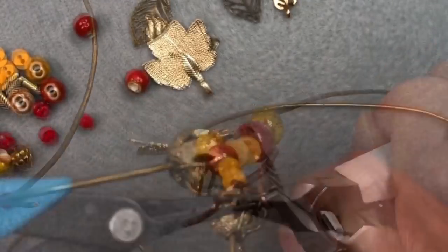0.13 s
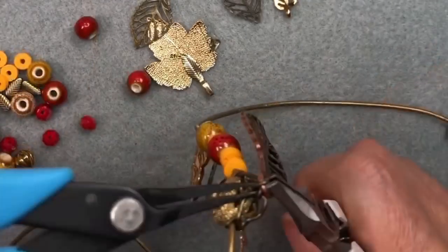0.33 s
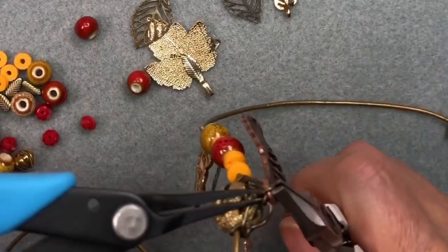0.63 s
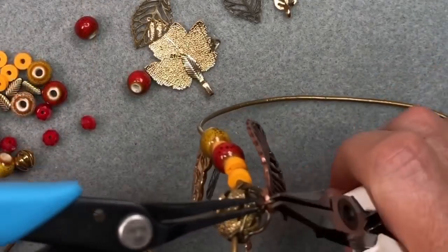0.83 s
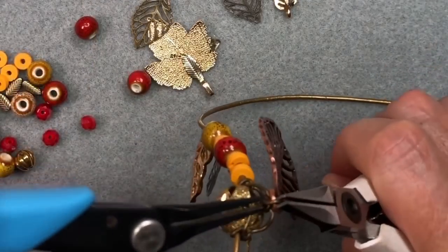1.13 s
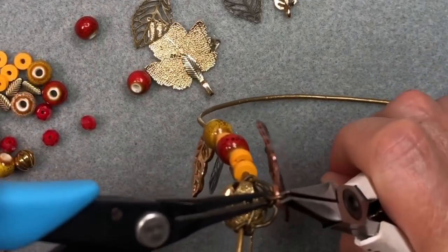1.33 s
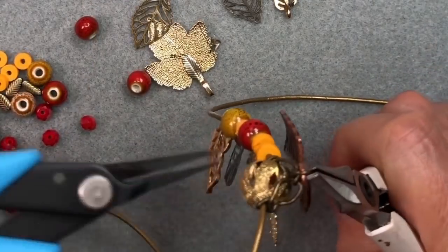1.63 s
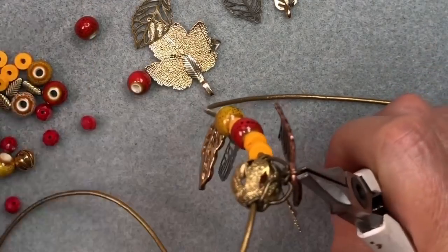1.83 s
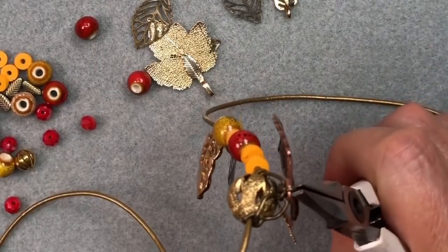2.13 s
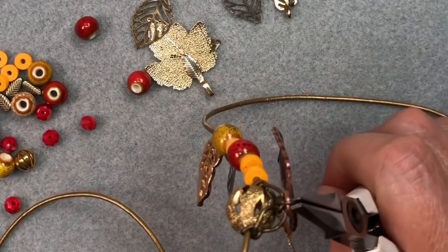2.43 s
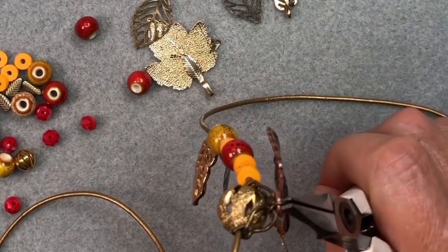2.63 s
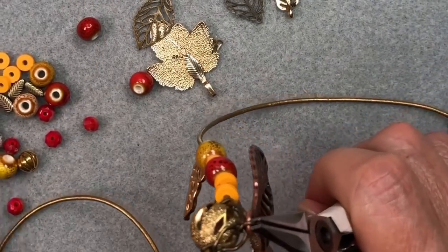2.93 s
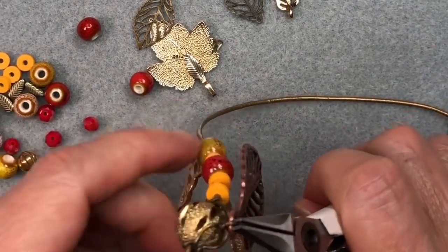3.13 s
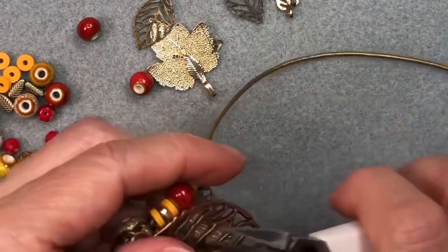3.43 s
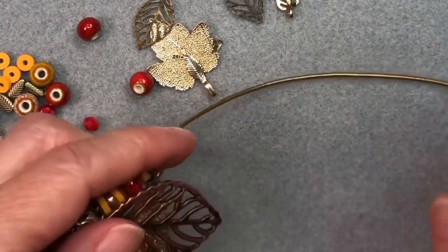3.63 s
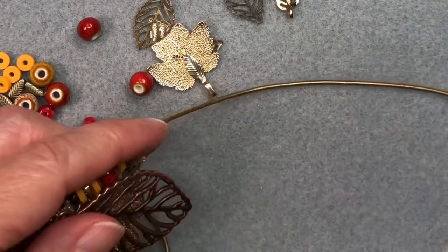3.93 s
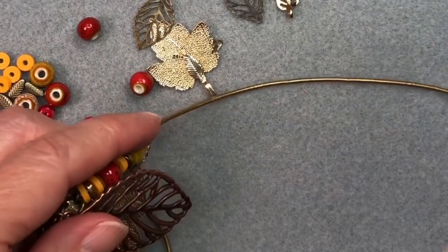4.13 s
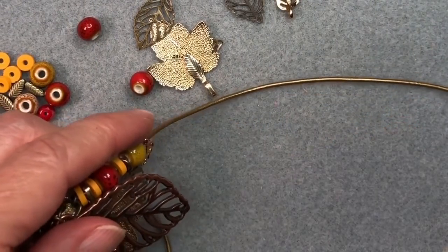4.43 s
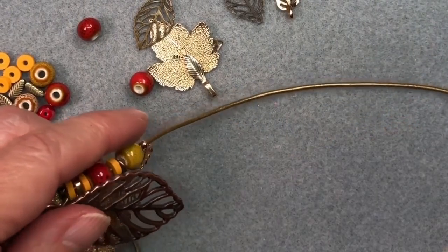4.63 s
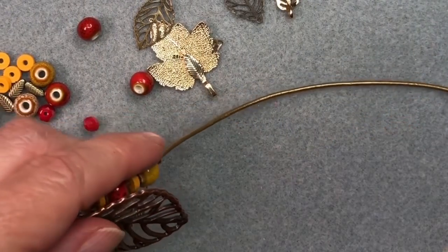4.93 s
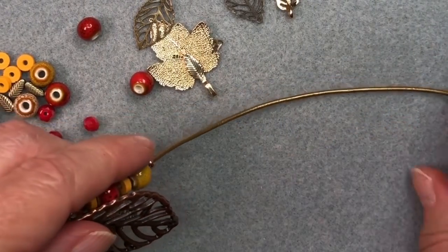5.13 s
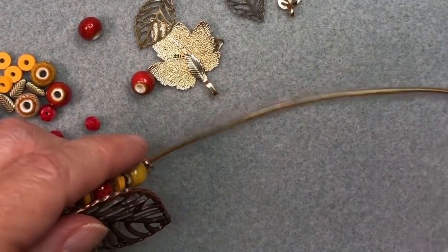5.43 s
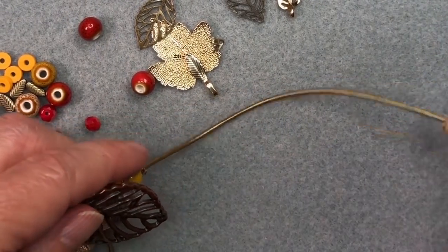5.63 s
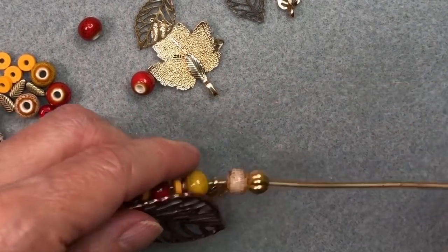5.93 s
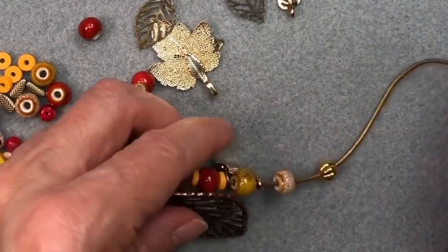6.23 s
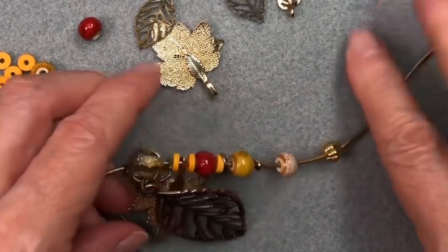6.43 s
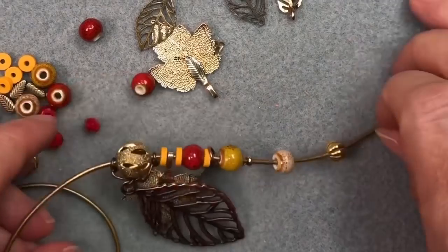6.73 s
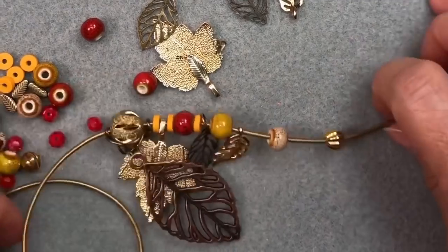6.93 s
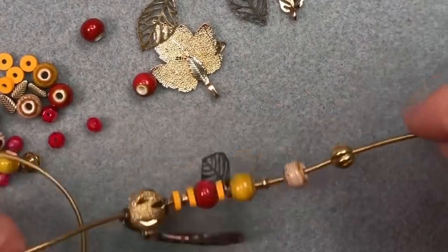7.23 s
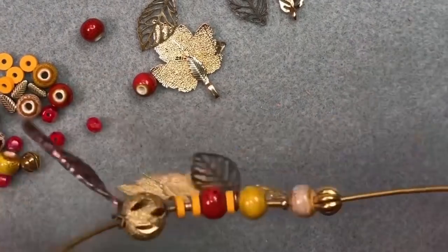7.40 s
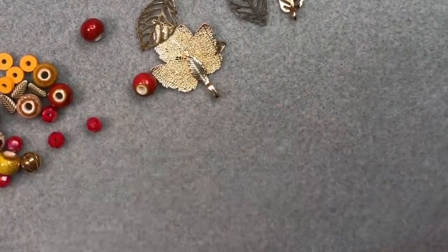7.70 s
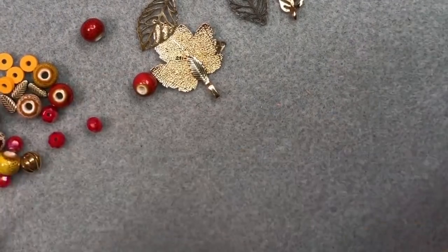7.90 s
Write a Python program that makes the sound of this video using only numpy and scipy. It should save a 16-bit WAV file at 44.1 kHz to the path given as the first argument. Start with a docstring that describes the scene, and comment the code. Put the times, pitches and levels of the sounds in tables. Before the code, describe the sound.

Fingers brush faintly over a felt mat in a quiet room, heard close up. Small pliers tick at about 1.5 seconds and clack at 2.4, with dull table thumps near 1.9 and 2.8. Around 3 seconds their hinge gives a very faint, thin squeak and tiny charms tinkle. At 4.3 a tool scrapes briefly on the board under the felt, landing with a sharp knock at 4.5. A wooden joint creaks faintly, rising, from about 4.9 to 5.7, with a bead knock and a metal clink at 5.3. Beads knock again at 6. The loudest moment comes at 6.4, when a large metal leaf clinks brightly twice while beads clatter on the board. Lighter taps and a clink follow just after 7. From 7.4 small charms tinkle delicately to the end, with another firm knock of beads at 7.8.

```python
"""Fingers brush a felt mat in a quiet room, and a tool lands with a soft thump: beadwork, heard up close.
Pliers and beads tick and clack, a hinge squeaks and small charms tinkle. Later a tool scrapes the board
under the felt, a wooden joint creaks, beads knock on the board and a large metal leaf clinks.
Things that ring are sums of fading tones; ticks, thuds and rubbing are shaped noise. The creak is a
quick run of tiny slips, each one knocking the wood."""
import sys
import numpy as np
from scipy import signal
from scipy.fft import rfft, irfft, next_fast_len
from scipy.io import wavfile
from scipy.ndimage import uniform_filter1d

SR = 44100
rng = np.random.default_rng(int(sys.argv[2]) if len(sys.argv) > 2 else 0)


def to_wav(sig):
    """Store sig (one row per channel, or 1-D mono) as 16-bit WAV at the path in sys.argv[1].

    Samples outside -1..1 are clipped; the rate is SR.
    """
    pcm = np.clip(np.atleast_2d(sig), -1, 1) * 32767
    pcm = np.round(pcm).astype(np.int16)
    wavfile.write(sys.argv[1], SR, pcm.T)  # frames by channels


N = 355622

# A fade_s is the time to fade by 60 dB. A blow's ring_factor multiplies it: smaller is more muffled.
# finger strokes over the felt: start_s, length_s, level_db
STROKES = [(-.02, 0.13, -65.5), (.08, 0.16, -67.5), (1.35, 0.12, -71), (2.222, 0.27, -61.5),
           (2.48, 0.26, -63.5), (2.666, 0.2, -59.5), (3.054, 0.29, -58), (3.376, 0.6, -64.5),
           (4.17, 0.4, -60), (5.018, 0.16, -59.5), (5.113, 0.14, -62), (5.3, 0.82, -62.5),
           (5.86, 0.17, -65), (5.98, 0.33, -70), (6.656, 0.22, -59), (6.698, 0.39, -59),
           (6.92, 0.26, -59.5), (7.351, 0.45, -75), (7.787, 0.35, -64)]
# tone colour of each steady or rubbing noise: pitch_hz, level_db
BRUSH_COLOUR = [(1500, -30), (3000, -14), (5000, -6), (8000, 0), (10500, -4), (13000, -12), (16000, -27)]
AIR_COLOUR = [(4.7, -38.5), (8.0, 10), (30, -10), (104, -25.5), (179, -32), (238, -22), (287, -33),
              (420, -32.5), (844, -40), (1090, -38.5), (1320, -40.5), (8810, -51.5), (15600, -51)]
MURMUR_COLOUR = [(60, -22.5), (120, 4.5), (240, -5), (400, -1), (700, -12.5), (1500, -16.5), (4000, -47.5)]
RUMBLE_COLOUR = [(20, -2.5), (60, 2.5), (110, -6.5), (200, -29.5), (500, -72.5)]
SCRAPE_COLOUR = [(88, -21), (150, 0), (346, -3.5), (800, -8), (1700, -5.5), (3500, -13.5), (8710, -19),
                 (14000, -32)]
# rise and fall of the room's low murmur: time_s, level_db
MURMUR_LEVELS = [(0.0, -77), (3.16, -62), (3.86, -75.5), (5.32, -56.5), (5.75, -74.5), (6.44, -58.5),
                 (8.06, -71)]
# dull tool thuds, two high ticks, a bright room tail: start_s, level_db, pitch_hz, fade_s, width_octaves
THUDS_AND_TREBLE = [(.073, -55.5, 450, 0.12, 0.43), (.0995, -50.5, 486, 0.18, 0.94),
                    (1.4945, -30.5, 8500, 0.033, 0.24), (1.494, -42, 2450, 0.087, 1.3),
                    (1.921, -52, 770, 0.15, 0.45), (1.9395, -33, 540, 0.072, 0.72),
                    (2.397, -40, 445, 0.2, 0.65), (2.421, -44.5, 1300, 0.072, 1.2),
                    (2.551, -55.5, 1150, .19, 0.98), (2.59, -48, 825, 0.038, 0.92),
                    (2.776, -23.5, 420, 0.087, 0.88), (2.778, -30, 2780, 0.076, 1.02),
                    (2.7835, -29.5, 5830, 0.022, 0.21), (4.505, -20.5, 850, 0.042, 1.2),
                    (4.508, -32.5, 370, 0.23, 0.44), (4.508, -35.5, 6450, 0.33, 0.34),
                    (4.537, -30, 390, 0.027, 1.7), (5.33, -39.5, 855, 0.18, 1.16),
                    (6.47, -25.5, 1920, 0.047, 0.91), (6.762, -50.5, 640, 0.2, 1.04)]
# pliers, beads and chain touching: start_s, level_db, pitch_hz
TICKS = [(0.0996, -49.5, 5650), (0.1674, -49.5, 3600), (1.2356, -55, 3280), (1.258, -58, 8100),
         (1.332, -61, 8600), (1.479, -49, 7500), (1.4943, -36, 8100), (1.514, -62, 7540),
         (1.662, -60, 6500), (1.7953, -52.5, 10100), (1.938, -44.5, 3230), (2.3942, -27.5, 11200),
         (2.41, -40, 11000), (2.4195, -35, 11000), (2.5576, -49.5, 6130), (2.5908, -46, 5900),
         (3.043, -50, 9600), (3.1128, -30.5, 9200), (3.237, -31.5, 11700), (3.3583, -56, 6480),
         (3.3812, -50, 8440), (4.2612, -50, 6050), (4.282, -45, 9640), (4.3982, -47, 4170),
         (4.5045, -15, 5630), (5.008, -54, 3230), (5.3557, -27, 6850), (5.5263, -42.5, 10000),
         (5.55, -48, 9500), (5.687, -41.5, 5600), (5.7259, -48, 7900), (5.8659, -31.5, 8600),
         (5.935, -56, 9000), (5.9534, -41, 11800), (6.022, -32, 4500), (6.3747, -5.5, 7000),
         (6.4203, -14, 6650), (7.056, -42, 9210), (7.068, -53, 9000), (7.1176, -27.5, 5430),
         (7.2165, -47, 7500), (7.2419, -32.5, 10900), (7.298, -47, 9200), (7.453, -48.5, 9990),
         (7.608, -51.5, 9000), (7.732, -60, 6380), (7.812, -42, 6000), (7.8196, -32, 3540),
         (7.9354, -38, 8360), (7.946, -48, 7600)]
# treble lost beside the microphone: pitch_hz, level_db
TREBLE_LOSS = [(9000, -5), (12000, -5), (16000, -27)]
# blows that set each thing ringing: start_s, level_db, pitch_hz, ring_factor
LEG_SWAYS = [(.085, -46.5, 60, 0.25), (1.933, -26.5, 36.4, 0.72), (2.57, -39.5, 32, 0.74),
             (2.69, -41, 70.5, 1), (2.776, -26, 70, 0.7), (4.3, -37, 37, 0.18), (4.505, -31.5, 37.2, 0.49),
             (6.023, -39, 50.3, 0.17), (6.376, -38.5, 31.8, 1), (6.76, -35, 30.6, 0.28)]
TABLE_THUMPS = [(.09, -44.5, 177, 0.53), (1.933, -26, 202, 0.72), (1.955, -25.5, 165, 0.84),
                (2.392, -31, 197, 0.96), (2.773, -17.5, 181.4, 0.44), (4.316, -71, 266, 0.67),
                (4.505, -34, 132, 0.65), (4.537, -35.5, 129, 1), (6.024, -29, 247, 0.92),
                (6.375, -35.5, 201, 1), (7.813, -37.5, 236, 1)]
PLIER_CLACKS = [(1.4965, -31, 9000, 0.24), (2.3943, -19, 4160, 0.68), (2.41, -25.5, 3000, 0.53),
                (2.42, -34, 2500, 0.4), (2.785, -31, 2900, 1.3)]
CHARM_TINKLES = [(3.103, -38, 7540, 0.1), (3.146, -37, 9100, 0.12), (3.166, -41, 9800, 0.14),
                 (3.197, -41, 8900, 0.13), (3.225, -38, 10700, 0.094), (3.252, -34, 8800, 0.16),
                 (3.281, -40, 9900, .11), (7.375, -55, 8600, .5), (7.389, -49, 9400, .25),
                 (7.393, -58, 12600, .4), (7.454, -37.5, 10500, 0.32), (7.462, -53, 6000, .3),
                 (7.52, -57, 10200, .2), (7.613, -50.5, 8600, 0.56), (7.617, -53, 13040, 0.48),
                 (7.65, -64, 7150, 0.55), (7.707, -59, 7400, .6), (7.71, -62, 12500, .3),
                 (7.74, -52, 8900, 0.28), (7.771, -56, 9040, 0.34), (7.821, -41, 7500, 0.62),
                 (7.826, -44, 11200, 0.74), (7.849, -41, 12700, 0.35), (7.967, -42.5, 10360, 0.4),
                 (8.01, -47, 11300, 0.27)]
BOARD_KNOCKS = [(5.327, -29, 975, 1), (5.3555, -18, 1320, 0.26), (6.0235, -10.5, 1035, 0.42),
                (6.315, -34, 836, 0.8), (6.3735, -7.5, 1310, 0.39), (6.394, -13.5, 835, 0.3),
                (6.4205, -11.5, 1260, 0.37), (6.445, -20, 1103, 0.57), (7.011, -34.5, 1390, 0.39),
                (7.047, -25, 1300, 0.24), (7.1185, -26.5, 1630, 0.33), (7.156, -36, 1620, 0.31),
                (7.226, -43, 1180, 0.5), (7.246, -33.5, 980, 0.21), (7.265, -41.5, 895, .47),
                (7.812, -13, 1070, 0.24), (7.8205, -9.5, 1550, 0.22)]
LEAF_CLINKS = [(5.3275, -34, 6840, 0.75), (5.356, -21.5, 7160, 0.33), (6.3765, -2.5, 7900, 0.41),
               (6.421, -3, 8030, 0.31), (7.118, -24, 6100, 0.38), (7.156, -48, 8000, 0.26)]
# the tones each thing rings with: pitch_hz, level_db, fade_s
LEG_TONES = [(32, 0, .3), (68.2, 0, 2.3)]
TABLE_TONES = [(138, 0, .4), (157, 0, .55), (200, 0, .3), (262, -4, .15), (335, -6, .12)]
PLIER_TONES = [(1430, 13, 0.015), (2870, -14, 0.06), (3580, -5, 0.02), (6100, -9, .03), (6860, -8, 0.05),
               (7700, -5, .025), (8760, -4, 0.09), (10450, -8, .035), (11300, -3, 0.045),
               (12700, -8, 0.035)]
CHARM_TONES = [(5300, -4, .1), (6100, -2, .1), (7150, -3, .18), (7450, -2, .12), (8300, -9, .06),
               (9020, 0, .12), (10000, 0, .12), (10900, -9, .05), (11600, -3, .11), (12550, -2, .12),
               (13100, -3, .1), (14100, -2, .1), (14800, -5, .08)]
BOARD_TONES = [(362.5, 7, 0.38), (522, -8, 0.11), (764.6, 0.5, 0.072), (823, -5, 0.12), (1070, -1.5, 0.021),
               (1151, 2.5, 0.069), (1300, -1.5, 0.049), (1496, -3.5, 0.057), (1863, 2.5, 0.059),
               (2050, -10.5, 0.24), (2192, -4.5, 0.092), (3270, -0.5, 0.075)]
# the metal leaf's tones: pitch_hz
LEAF_PITCHES = [3263, 3546, 5042, 5492, 5980, 6392, 6640, 6948, 7401, 7475, 7947, 8142, 8556, 8746, 8850,
                9040, 9311, 9560, 10278, 10665, 11086, 11364, 11837, 12263, 12645, 13678, 14312, 14958,
                5609, 7300, 8247, 9437, 10440]
# how each of those tones rings: level_db, fade_s
LEAF_RING = [(1.5, 0.087), (-2.5, 0.098), (-6.5, 0.19), (-11.5, 0.2), (-1, 0.13), (-1, 0.3), (-4, 0.45),
             (-6.5, 0.25), (-4, 0.43), (1, 0.083), (-11, 0.11), (-1.5, 0.24), (-12, 0.13), (-11, 0.25),
             (-3, 0.3), (-14, 0.51), (-0.5, 0.2), (-30.5, 0.17), (-16, 0.45), (-14, 0.27), (-26.5, 0.18),
             (-9, 0.27), (-21.5, .2), (-20, 0.12), (-19.5, 0.11), (-15.5, .18), (-20, .15), (-29.5, .15),
             (-11.5, 0.18), (-5, .06), (-18.5, .2), (-15, .13), (-17.5, 0.21)]
# squeak of the pliers' hinge: time_s, pitch_hz, level_db
SQUEAK = [(2.96, 11300, -80), (2.99, 12100, -75), (3.04, 12100, -69), (3.09, 11900, -72)]
# a tool's scraping jerks, then the noisy tail of its landing: start_s, level_db
SCRAPES_AND_TAIL = [(4.267, -43.5), (4.304, -37.5), (4.345, -75), (4.4, -68), (4.452, -51), (4.509, -34.5)]
# a wooden joint slipping: time_s, slips_per_s, level_db
CREAK = [(4.86, 40.5, -53), (4.93, 44.87, -54.5), (5.0, 53.7, -55.5), (5.08, 71.8, -49.5),
         (5.3, 77.7, -49.5), (5.42, 89.9, -46.5), (5.5, 123.2, -49.5), (5.6, 133.4, -54),
         (5.68, 146.3, -64)]
# tones of the creaking wood: pitch_hz, width_hz, level_db
WOOD_TONES = [(124, 110, -17), (210.6, 44, 7), (339, 44, -1), (636, 900, -2)]
# how long the room echoes: pitch_hz, fade_s
ROOM_FADES = [(150, 0.64), (600, 0.34), (2000, 0.36), (6000, 0.3), (14000, 0.28)]

TIME_S = np.arange(N) / SR
ROCK_DEPTH, ROCK_HZ = .3, 80  # loose pieces rock after a blow, so their ring flutters


def gain_of(db):
    """Turns decibels into a number to multiply by."""
    return 10 ** (np.asarray(db) / 20)


def evened(x):
    """Scales a signal to an average strength (rms) of 1."""
    return x / np.sqrt(np.mean(x ** 2) + 1e-20)


def at_pitch(points, hz):
    """Looks up a table between its rows, on a scale of octaves."""
    pitches, values = np.transpose(points)
    return np.interp(np.log(hz + 1), np.log(pitches + 1), values)


def over_time(rows):
    """Turns each column after time_s into one value per sample."""
    times, *columns = np.transpose(rows)
    return [np.interp(TIME_S, times, column) for column in columns]


def add(mix, start_s, sound):
    """Mixes a sound in at its start time."""
    part = mix[round(start_s * SR):][:len(sound)]
    part += sound[:len(part)]


def coloured(x, colour):
    """Turns each pitch up or down as the table says."""
    size = next_fast_len(N)
    gains = gain_of(at_pitch(colour, np.fft.rfftfreq(size, 1 / SR)))
    return irfft(rfft(x, size) * gains, size)[:N]


def noise(colour):
    """Noise of strength 1 with the given tone colour."""
    return evened(coloured(rng.standard_normal(next_fast_len(N)), colour))


def wobble(samples):
    """A random wiggle: more samples make it slower."""
    return evened(uniform_filter1d(rng.standard_normal(N), size=samples))


def hump(hz, centre_hz, octaves):
    """Favours the pitches near a centre pitch."""
    return np.exp(-.5 * (np.log2(hz / centre_hz) / octaves) ** 2)


def bursts(events, rise_s):
    """Short puffs of noise that start with a snap and fade without ringing."""
    out, t = np.zeros(N), np.arange(8192) / SR
    hz = np.fft.rfftfreq(len(t), 1 / SR) + 1
    snap = 1 + 1.9 * np.exp(-t / .00039)  # the first contact is strongest
    onset = 1 - np.exp(-t / rise_s)
    for start_s, level_db, pitch_hz, fade_s, octaves in events:
        puff = evened(irfft(rfft(rng.standard_normal(len(t))) * hump(hz, pitch_hz, octaves)))
        add(out, start_s, gain_of(level_db - 60 * t / fade_s) * puff * snap * onset)
    return out


def struck(blows, tones, octaves, rise_s, scatter_db=2.5, rock=0):
    """Each blow rings the tones near its pitch, in a slightly different balance every time."""
    out = np.zeros(N)
    hz, tone_db, fade_s = np.transpose(tones)[:, :, None]
    for start_s, level_db, pitch_hz, ring_factor in blows:
        scatter, speed, phase = rng.standard_normal((3, len(tones), 1))
        ring_s = fade_s * ring_factor
        t = np.arange(round(ring_s.max() * SR)) / SR
        share = gain_of(tone_db + scatter_db * scatter) * hump(hz, pitch_hz, octaves)
        flutter = 1 + rock * np.sin(2 * np.pi * (ROCK_HZ * np.exp(speed / 2) * t + phase))
        ring = (share * flutter * gain_of(-60 * t / ring_s) * np.sin(2 * np.pi * hz * t)).sum(0)
        onset = 1 - np.exp(-t / rise_s)
        add(out, start_s, gain_of(level_db) * ring * onset / np.linalg.norm(share))
    return out


def finger_brushing(grain):
    """Fingers rub the felt; fibres catch and let go, making the hiss grainy."""
    resting_db, grain_db, snaps_per_s = -74.5, 2.4, 59
    power = np.full(N, gain_of(resting_db) ** 2)
    for start_s, length_s, level_db in STROKES:
        progress = np.clip((TIME_S - start_s) / length_s, 0, 1)
        power += (gain_of(level_db) * np.sin(np.pi * progress) ** 2) ** 2
    snaps = rng.random(N) < snaps_per_s / SR  # beads and fibres snap under the fingers
    sizes = gain_of(7 * np.minimum(rng.exponential(1, N), 4))
    grit = gain_of(-16.5) * evened(signal.lfilter([1], [1, -.985], snaps * sizes))
    return np.sqrt(power) * noise(BRUSH_COLOUR) * (gain_of(grain_db * grain) + grit)


def room_air():
    """A faint steady hiss under a low murmur that comes and goes."""
    hiss = gain_of(-48) * noise(AIR_COLOUR)
    return hiss + gain_of(over_time(MURMUR_LEVELS)[0]) * noise(MURMUR_COLOUR)


def arm_rumble():
    """Arms leaning on the table make a low noise that swells at random."""
    waves = [np.sin(2 * np.pi * (hz * TIME_S + rng.random())) for hz in np.geomspace(.5, 6, num=12)]
    return gain_of(-71 + 6.5 * evened(sum(waves))) * noise(RUMBLE_COLOUR)


def thuds_and_treble():
    """Dull tool thuds, two thin high ticks and a bright fading room tail, all puffs of noise."""
    return bursts(THUDS_AND_TREBLE, rise_s=.0001)


def leg_sways():
    """A bump sets the whole table swaying on its legs."""
    return struck(LEG_SWAYS, LEG_TONES, octaves=.53, rise_s=.00088)


def table_thumps():
    """Tools set down make the table top boom."""
    return struck(TABLE_THUMPS, TABLE_TONES, octaves=.2, rise_s=.0022)


def small_ticks():
    """Pliers, beads and chain tick off to the microphone's side, which dulls the treble."""
    fade_s, octaves = .054, 1
    ticks = bursts([(*tick, fade_s, octaves) for tick in TICKS], rise_s=.00013)
    return coloured(ticks, TREBLE_LOSS)


def plier_clacks():
    """Pliers slip off a ring, or bounce when laid down."""
    return struck(PLIER_CLACKS, PLIER_TONES, octaves=1.9, rise_s=.00064, rock=ROCK_DEPTH)


def hinge_squeak():
    """The pliers' hinge gives one thin, sliding tone."""
    pitch_hz, level_db = over_time(SQUEAK)
    moving = (TIME_S > SQUEAK[0][0]) & (TIME_S < SQUEAK[-1][0])
    return moving * gain_of(level_db) * np.sin(2 * np.pi * np.cumsum(pitch_hz) / SR)


def charm_tinkles():
    """Small charms and rings touch, ringing differently each time."""
    return struck(CHARM_TINKLES, CHARM_TONES, octaves=.24, rise_s=.00023, scatter_db=4)


def tool_scrape_and_tail(grain):
    """A tool scrapes over rough patches of the board, then its landing leaves a noisy tail."""
    rise_s, fade_db_per_s, grain_db = .0066, 160, 1.4
    power, t = np.zeros(N), np.arange(SR // 2) / SR
    for start_s, level_db in SCRAPES_AND_TAIL:
        swell = np.minimum(t / rise_s, 1) * gain_of(level_db - fade_db_per_s * t)
        add(power, start_s, swell ** 2)
    return gain_of(grain_db * grain) * np.sqrt(power) * noise(SCRAPE_COLOUR)


def joint_creak():
    """A wooden joint slips faster and faster, a little unevenly; each slip knocks the wood."""
    slips_per_s, level_db = over_time(CREAK)
    count = np.cumsum(slips_per_s * (1 + .004 * wobble(samples=600))) / SR
    moving = (TIME_S > CREAK[0][0]) & (TIME_S < CREAK[-1][0])
    slips = np.diff(np.floor(count), prepend=0) * moving
    t = TIME_S[:4000]
    knock = sum(gain_of(db) * np.exp(-np.pi * width_hz * t) * np.sin(2 * np.pi * hz * t)
                for hz, width_hz, db in WOOD_TONES)
    strength = gain_of(level_db) * np.sqrt(SR / slips_per_s) / np.linalg.norm(knock)
    return signal.oaconvolve(slips * strength, knock)[:N]


def bead_knocks():
    """Beads knock on the board through the felt."""
    return struck(BOARD_KNOCKS, BOARD_TONES, octaves=.78, rise_s=.00045, rock=ROCK_DEPTH)


def leaf_clinks():
    """The large metal leaf clinks with nearly the same ring each time."""
    tones = np.column_stack([LEAF_PITCHES, LEAF_RING])
    return struck(LEAF_CLINKS, tones, octaves=.83, rise_s=.00058, scatter_db=1.5, rock=ROCK_DEPTH)


def room_echo(x):
    """Many small reflections blur into a tail; low pitches last longest."""
    reflections, slots = np.zeros(SR // 2), np.arange(150, SR // 2 - 20, 20)
    reflections[slots + rng.integers(0, 20, len(slots))] = rng.choice([-1., 1.], len(slots))
    hz, t, bands = signal.stft(reflections, SR, nperseg=256)
    fade = gain_of(-60 * t / at_pitch(ROOM_FADES, hz)[:, None])
    tail = signal.istft(bands * fade, SR, nperseg=256)[1]
    return signal.oaconvolve(x, tail / np.linalg.norm(tail))[:N]


def scene():
    """Mixes the hits and their echo with the rubbing and the quiet room, in one channel."""
    hits = leaf_clinks() + plier_clacks() + charm_tinkles() + small_ticks() + bead_knocks()
    puffs = thuds_and_treble()
    table = table_thumps() + leg_sways()
    air = room_air()
    echo = room_echo(gain_of(-10.5) * hits + gain_of(-19) * puffs)  # thuds on felt echo little
    joints = hinge_squeak() + joint_creak()
    grain = wobble(samples=150)
    rubbing = finger_brushing(grain) + tool_scrape_and_tail(grain)
    return (hits + puffs + table + air + echo + joints + rubbing + arm_rumble())[None]


def record(dry):
    """Clips anything past full scale, then cuts the very highest treble."""
    low_pass = signal.firwin(511, cutoff=15750, window=("kaiser", 9), fs=SR)
    return signal.oaconvolve(np.clip(dry, -1, 1), low_pass[None], "same")


dry = scene()
out = record(dry)
to_wav(out)
```